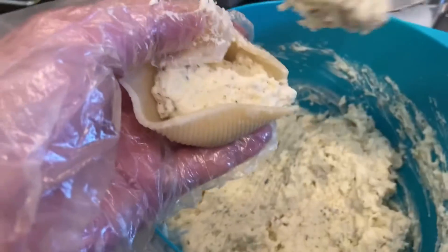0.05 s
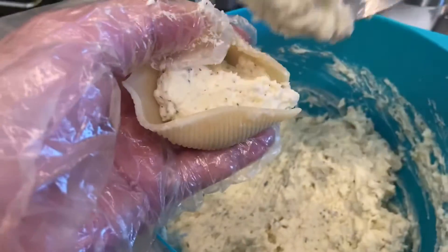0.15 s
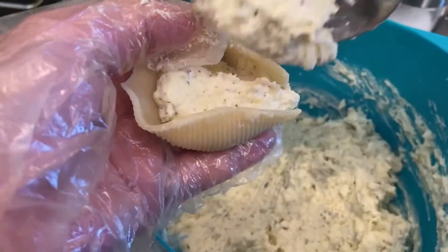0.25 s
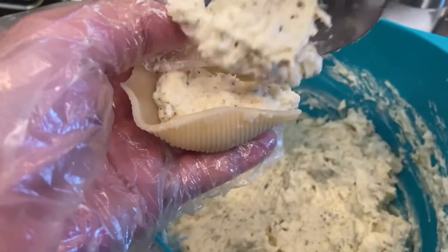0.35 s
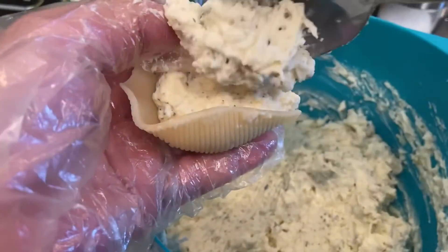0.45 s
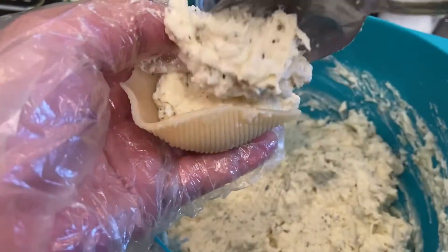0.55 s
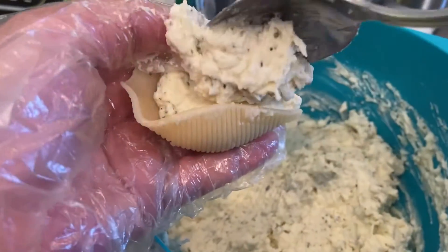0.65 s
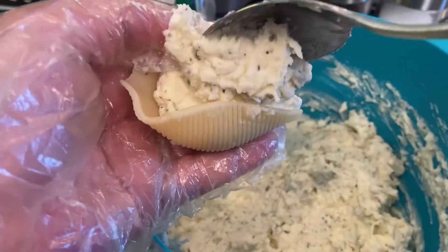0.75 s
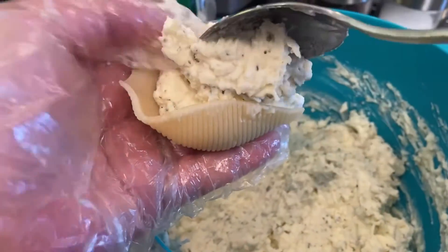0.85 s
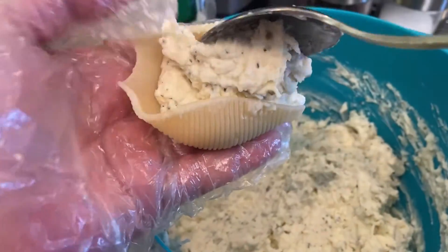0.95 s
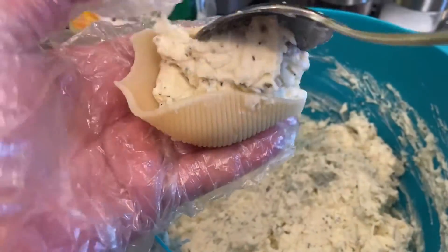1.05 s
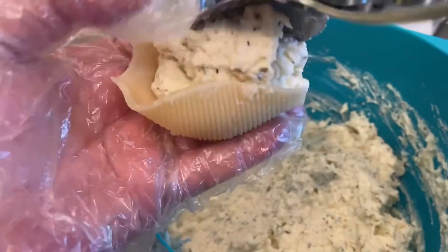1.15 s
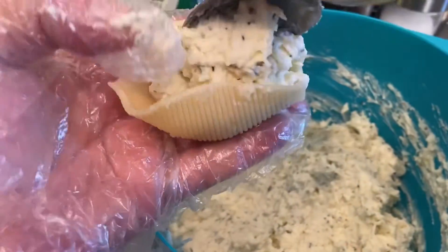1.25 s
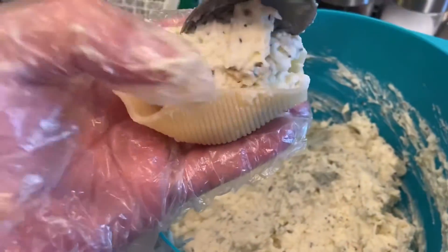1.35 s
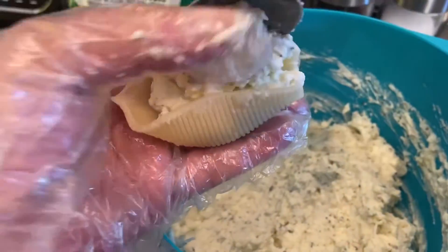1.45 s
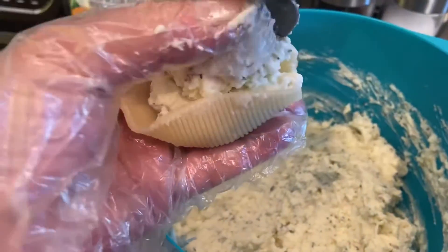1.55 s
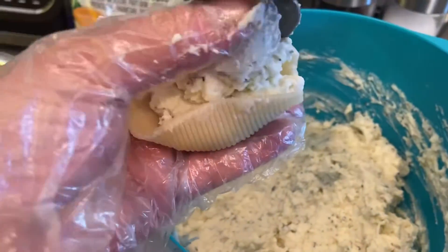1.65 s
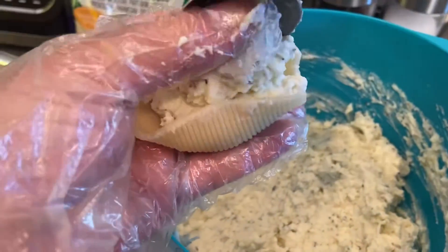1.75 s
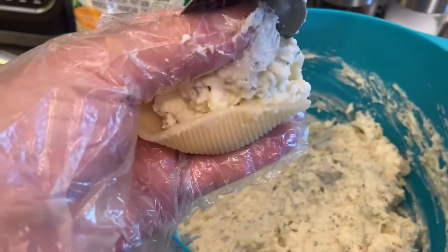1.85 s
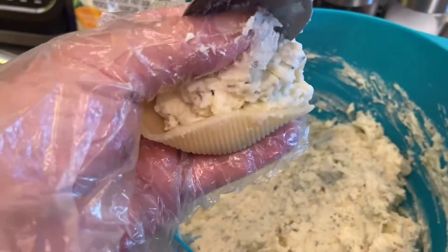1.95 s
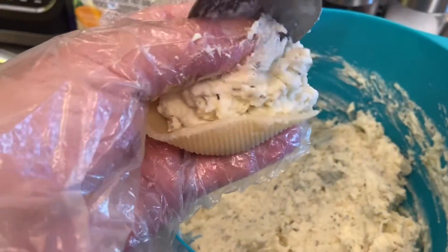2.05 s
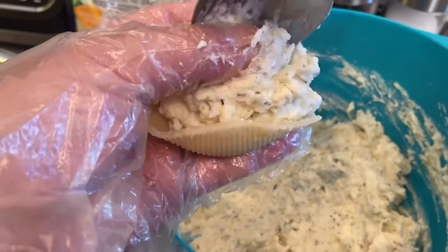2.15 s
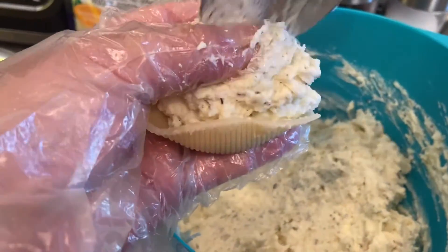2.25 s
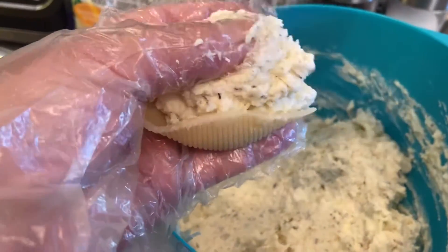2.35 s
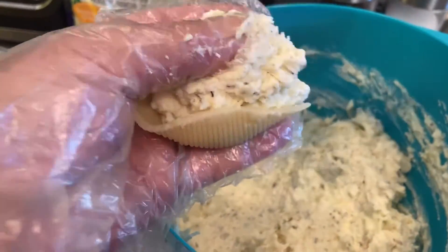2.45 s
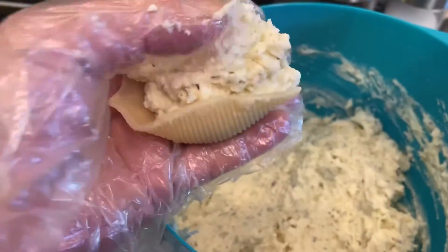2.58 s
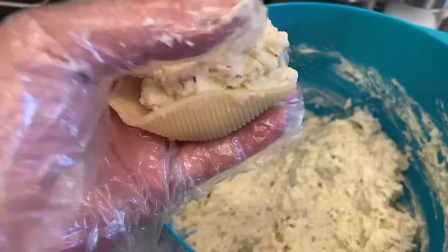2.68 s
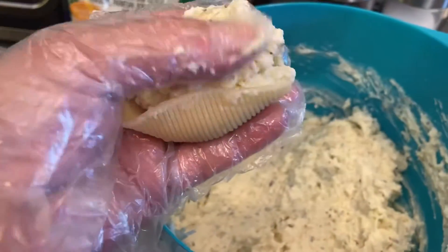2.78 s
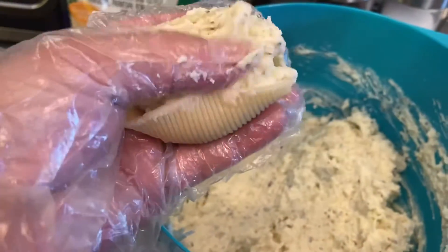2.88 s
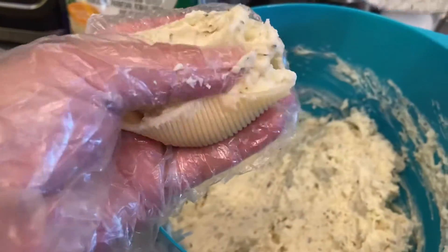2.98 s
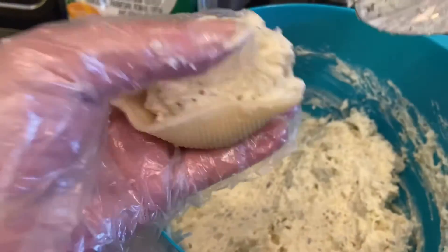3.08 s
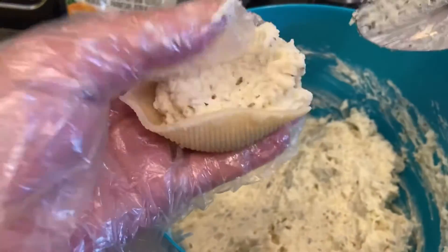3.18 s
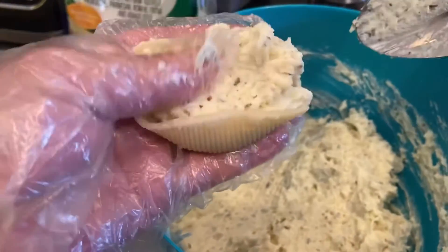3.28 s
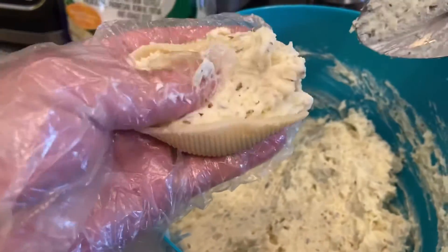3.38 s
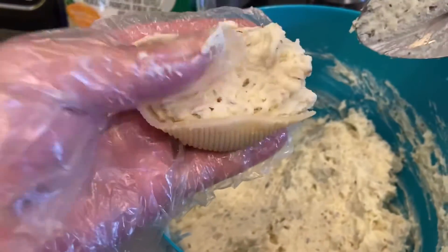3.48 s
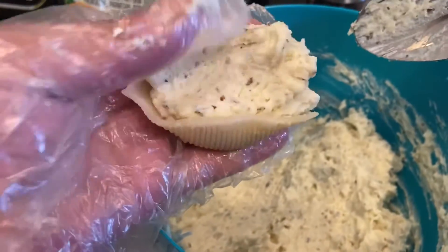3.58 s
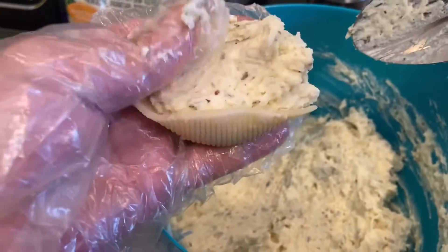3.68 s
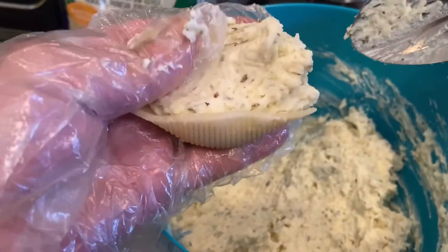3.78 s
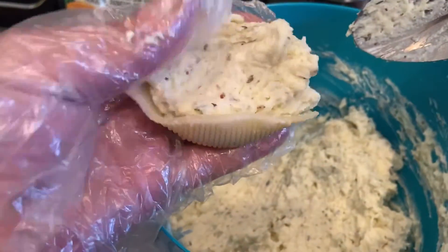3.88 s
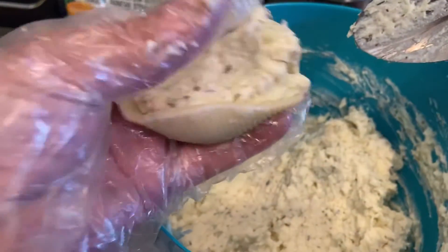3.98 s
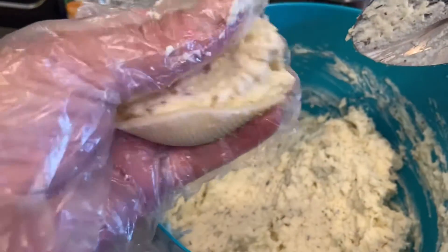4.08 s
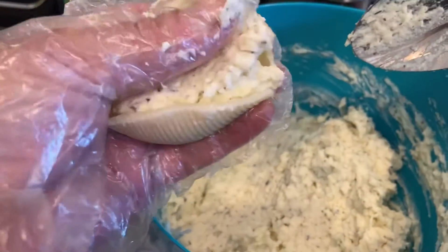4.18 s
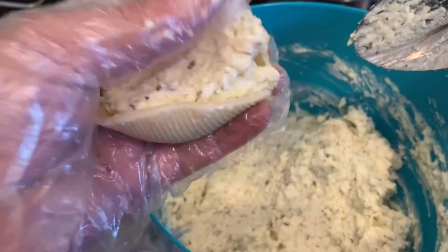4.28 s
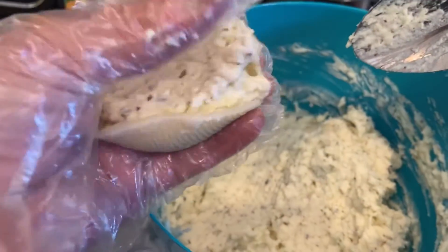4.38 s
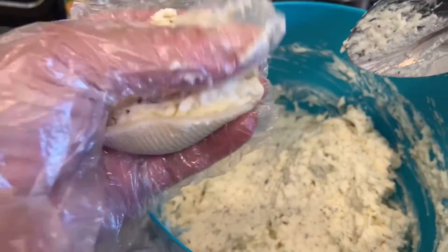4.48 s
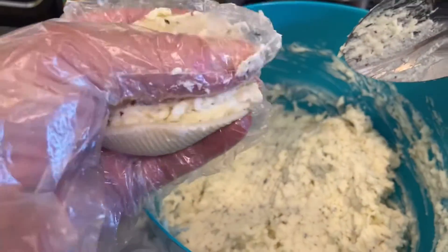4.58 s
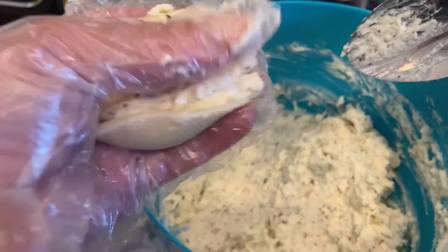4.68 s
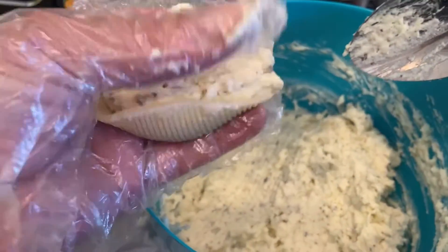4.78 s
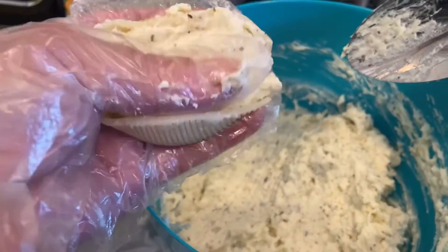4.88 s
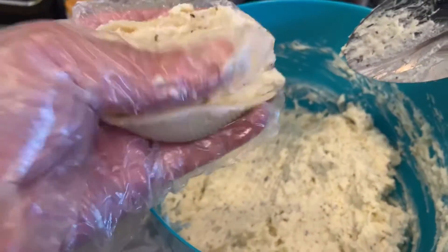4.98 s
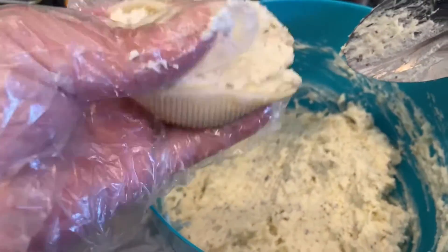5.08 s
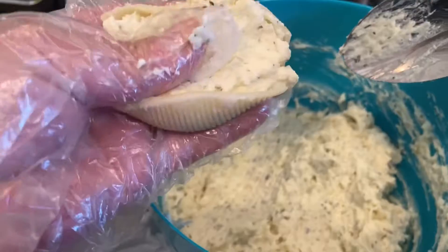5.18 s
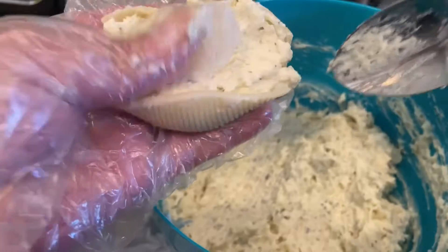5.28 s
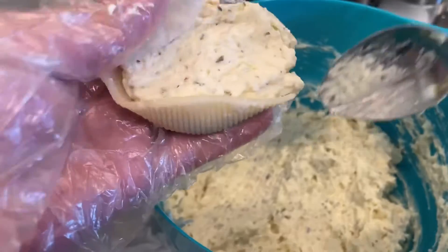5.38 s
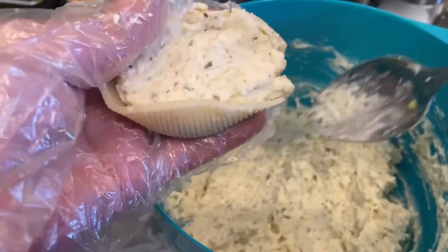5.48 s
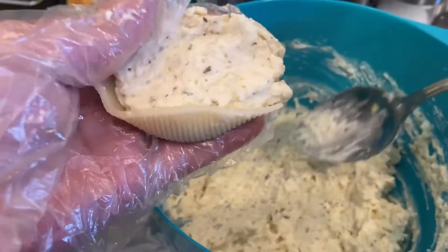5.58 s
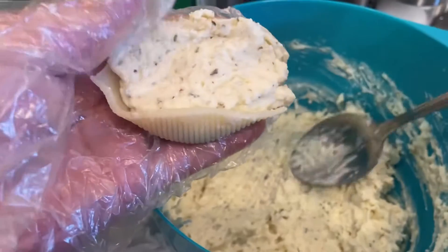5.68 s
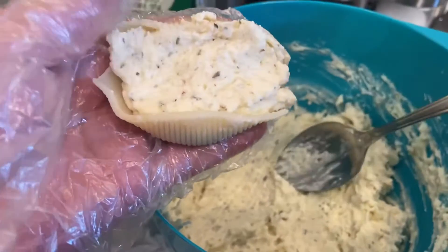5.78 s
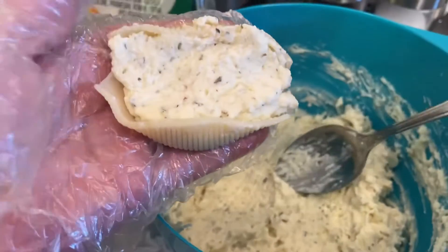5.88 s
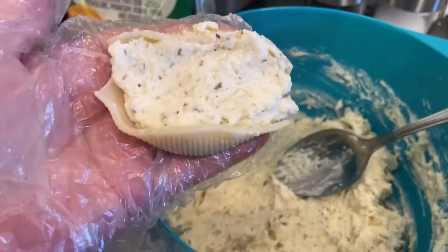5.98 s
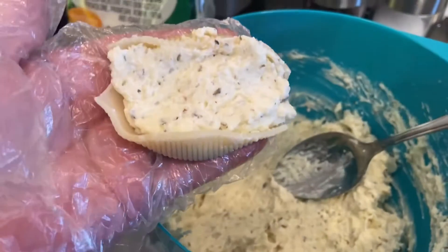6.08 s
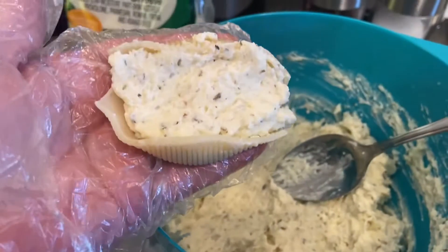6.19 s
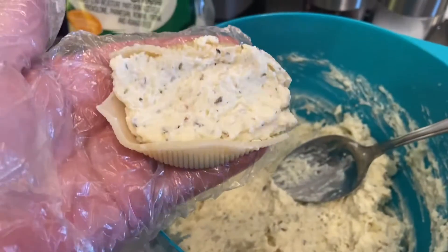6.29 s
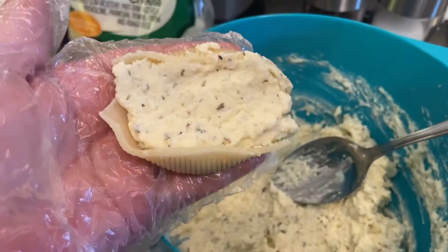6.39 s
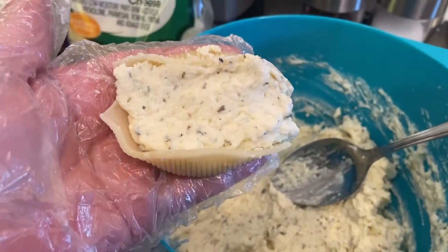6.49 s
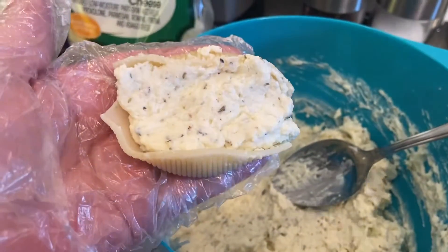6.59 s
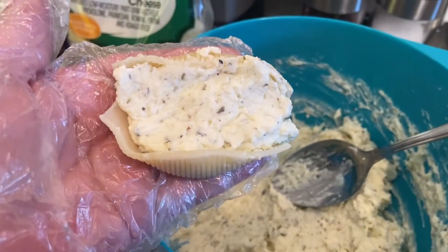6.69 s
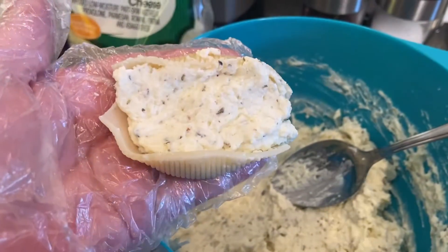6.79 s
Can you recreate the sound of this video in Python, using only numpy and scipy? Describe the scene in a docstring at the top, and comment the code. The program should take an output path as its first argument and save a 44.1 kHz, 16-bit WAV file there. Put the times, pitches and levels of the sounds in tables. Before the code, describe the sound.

A quiet kitchen heard from very close in stereo, with soft low rumble and faint appliance hum throughout. From 0 s a thin plastic glove rustles lightly, with dry crackle and sharp ticks. Between 0.2 and 0.9 s a spoon drags through thick filling in three short gritty mid-high scrapes, leaning left. From 1 to 2.5 s the film keeps rubbing in moderate, overlapping strokes, with moist squelches and tiny low pops. From about 3 to 5.5 s the strokes become much louder, separate bright swishes, strongest near 3.1, 3.5, 3.9, 4.35 and 5.4 s, with snapping creases. Movement fades after 5.7 s. At 6.1 s a spoon lands against the plastic bowl: a sharp, short, hollow clack, rapid smaller chatter for about 0.05 s and a faint room tail. Sparse, weak crinkles and ticks continue to the end, about 6.8 s.

```python
"""A kitchen, close to a small two-port microphone: a gloved hand smooths thick filling into a pasta shell.
The thin plastic film rustles as shaped hiss and crackle with each thumb stroke; flipping creases snap as ticks.
A spoon drags through the filling as gritty noise in a moving resonance; air pockets pop as fading sine blips.
Late on, the spoon drops against a plastic bowl and chatters: decaying modes and a faint room tail.
A low rumble of filtered noise, with a few hums, lies under everything."""
import sys
import numpy as np
from scipy import signal
from scipy.fft import rfft, irfft, next_fast_len
from scipy.io import wavfile
from scipy.ndimage import uniform_filter1d

SR = 44100
rng = np.random.default_rng(int(sys.argv[2]) if len(sys.argv) > 2 else 0)


def store_wav(level_fs):
    """Save 16-bit WAV to argv[1]."""
    pcm = np.round(np.clip(np.atleast_2d(level_fs), -1, 1) * 32767)
    wavfile.write(sys.argv[1], SR, pcm.T.astype(np.int16))


def voltage_ratio(level):
    """Linear amplitude factor for a level in decibels (scalar or array-like)."""
    return 10 ** (np.asarray(level, float) / 20)


N = 301644  # samples


def evened(x):
    """Scales to rms 1."""
    return x / np.sqrt(np.mean(x ** 2) + 1e-20)


def read(points, hz, column=1):
    """Reads a spectrum table on a log-frequency axis."""
    table = np.transpose(points)
    return np.interp(np.log(hz + 1), np.log(table[0] + 1), table[column])


def curve(rows, column=1):
    """Reads a control curve at every sample."""
    table = np.transpose(rows)
    return np.interp(np.arange(N) / SR, table[0], table[column])


def shaped(x, gain):
    """Filters by a gain given as a function of Hz."""
    size = next_fast_len(x.shape[-1] + 512)
    spectrum = rfft(x, size) * gain(np.fft.rfftfreq(size, 1 / SR))
    return irfft(spectrum, size)[..., :x.shape[-1]]


def hump(centre_hz, share):
    """A bell-shaped band on a log axis; share is its spread relative to the centre."""
    return lambda hz: np.exp(-.5 * (np.log((hz + 1) / centre_hz) / share) ** 2)


def wander(samples):
    """Slow random movement of rms 1: white noise averaged over a number of samples."""
    return evened(uniform_filter1d(rng.standard_normal(N), samples))


# Colour of the kitchen rumble: (frequency [Hz], relative density [dB per Hz])
RUMBLE_COLOUR = [(12, -55), (20, -11), (59, 8.5), (81, 7.5), (104, 1), (242, -13.5), (313, -16),
                 (369, -20.5), (584, -34), (652, -17.5), (714, -26), (1330, -31.5), (1600, -46),
                 (2080, -72), (3520, -120)]
# Swell of the deepest part of the rumble: (time [s], level [dB])
RUMBLE_SWELL = [(0, -61), (.08, -62), (.14, -44.5), (.25, -48.5), (.34, -59.5), (2.2, -57), (2.7, -55),
                (3.3, -59), (4.7, -64), (5.9, -60), (6.14, -53), (6.4, -60.5), (6.84, -59)]
# How alike the rumble is at the two ports: (frequency [Hz], likeness [-1 to 1])
RUMBLE_LIKENESS = [(60, 0.91), (130, 0.93), (290, 0.59), (640, -0.07), (1410, -0.8), (3100, 1),
                   (6820, -0.06), (15000, 0.2)]
# Hums of appliances: (frequency [Hz], width [Hz], level [dB])
APPLIANCE_HUMS = [(84, 23, -63), (284.4, 11.5, -70.5), (321.9, 3.2, -69)]


def rumble():
    """Room noise with a likeness between ports set by frequency; its deepest part swells; narrow noises hum."""
    upper_db = -61
    first, second = rng.standard_normal((2, N))

    def same(hz):
        return np.clip(read(RUMBLE_LIKENESS, hz), -1, 1)

    def deep(hz):
        return 1 / (1 + (hz / 130) ** 4)

    def colour(hz):
        return voltage_ratio(read(RUMBLE_COLOUR, hz))

    right = shaped(first, same) + shaped(second, lambda hz: np.sqrt(1 - same(hz) ** 2))
    pair = np.array([first, right])
    out = evened(shaped(pair, lambda hz: deep(hz) * colour(hz))) * voltage_ratio(curve(RUMBLE_SWELL))
    out += evened(shaped(pair, lambda hz: (1 - deep(hz)) * colour(hz))) * voltage_ratio(upper_db)
    for hz, width_hz, db in APPLIANCE_HUMS:
        band = hump(hz, width_hz / hz / 2)
        out += voltage_ratio(db) * evened(shaped(rng.standard_normal(N), band))
    return out


# Movements of the gloved thumb and fingers:
# (peak time [s], effort level [dB], rise [s], fall [s], extra squelch effort where it digs in [dB])
THUMB_STROKES = [(.04, -55.5, .1, 0.3, 0.5), (.13, -61.5, 0.13, 0.2, -5), (.2, -63, 0.027, 0.025, 0),
                 (.3, -62.5, .03, .04, 7), (.405, -54.5, 0.054, 0.021, -1.5),
                 (.445, -50.5, 0.026, 0.034, -2), (.483, -55.5, .015, 0.045, 2),
                 (.562, -54, 0.038, 0.032, -5), (.61, -57, .04, 0.1, -1), (.665, -59, 0.016, 0.035, 2),
                 (.75, -50.5, 0.071, 0.14, -0.5), (.885, -51.5, 0.037, 0.12, 4),
                 (.96, -49, 0.11, 0.048, -1.5), (1.04, -53.5, 0.05, .05, 1),
                 (1.125, -51.5, 0.097, 0.18, -2.5), (1.21, -51.5, 0.11, 0.11, -1.5),
                 (1.335, -50, 0.013, 0.16, -1), (1.45, -50.5, 0.11, 0.091, 3), (1.53, -48, 0.071, 0.12, 2),
                 (1.65, -52.5, 0.048, 0.11, 6), (1.71, -48.5, 0.081, 0.059, -4),
                 (1.79, -50.5, 0.045, 0.095, 1), (1.88, -51.5, 0.094, 0.21, -5),
                 (1.99, -56.5, 0.11, 0.15, 6), (2.13, -56, 0.1, 0.11, -5), (2.2, -54.5, 0.097, 0.08, 3),
                 (2.3, -45.5, 0.028, 0.038, -3), (2.38, -56.5, 0.043, 0.089, 6.5),
                 (2.52, -48.5, 0.028, 0.3, -2), (2.67, -44, 0.14, 0.1, 2.5), (2.79, -47, 0.066, 0.24, -7),
                 (2.88, -48, 0.17, 0.064, -6), (2.96, -50, 0.061, 0.064, -2),
                 (3.12, -36.5, 0.064, 0.072, -1.5), (3.249, -40.5, 0.026, 0.22, -2.5),
                 (3.525, -36.5, 0.043, 0.12, -5), (3.688, -38.5, 0.064, 0.072, -2),
                 (3.798, -49, 0.099, 0.055, 3), (3.923, -36.5, 0.037, 0.042, 1),
                 (4.04, -46.5, 0.11, 0.092, 2), (4.14, -41.5, 0.078, 0.082, -3),
                 (4.346, -36, 0.028, 0.05, -2.5), (4.52, -43.5, 0.21, 0.12, 0),
                 (4.762, -41.5, 0.061, 0.07, 1.5), (4.91, -44.5, 0.076, 0.082, 0.5),
                 (5.06, -38, 0.046, 0.073, -1), (5.17, -40.5, .06, 0.094, 2), (5.331, -55, .015, .04, -5),
                 (5.37, -34.5, 0.035, 0.029, 0), (5.45, -41.5, 0.057, 0.083, 2.5),
                 (5.68, -47.5, 0.072, 0.083, -3), (5.81, -55.5, 0.12, 0.18, 0),
                 (5.92, -55.5, 0.18, 0.18, 5.5), (6.01, -51.5, 0.15, .1, -3),
                 (6.11, -55.5, 0.041, 0.076, 0), (6.3, -62, .08, 0.14, -3), (6.41, -60, 0.017, 0.18, -6),
                 (6.58, -68, .015, 0.024, -4), (6.635, -68.5, 0.0089, .025, 6),
                 (6.83, -67, 0.016, .03, -4.5)]


def effort():
    """Every stroke swells to its peak and dies away; powers add. In dB: plain, and with the digging in."""
    rest_db = -77.5  # glove at rest
    ends_db, roundness = -13.5, 1.23  # drop after one rise or fall time, shape of the top
    t = np.arange(0, N + 64, 64) / SR  # coarse steps, joined up below
    power = np.full((2, len(t)), voltage_ratio(2 * rest_db))
    for s, db, rise, fall, dig_db in THUMB_STROKES:
        away = abs(t - s) / np.maximum(np.where(t < s, rise, fall), .005)
        peak_db = db + np.array([[0], [dig_db]])
        power = power + voltage_ratio(2 * (peak_db + ends_db * away ** roundness))
    return np.array([np.interp(np.arange(N) / SR, t, 10 * np.log10(row)) for row in power])


def sliding(flicker_db, patchy_db):
    """Hiss whose colour shifts in patches as other folds of film rub."""
    noise = rng.standard_normal((2, N)) * voltage_ratio(flicker_db * wander(300))
    z = signal.stft(noise, nperseg=256)[2]
    patches = rng.standard_normal(z.shape[1:])
    patches = uniform_filter1d(patches, size=5, axis=0)  # across frequency
    patches = evened(uniform_filter1d(patches, size=9, axis=1))  # across time
    return evened(signal.istft(z * voltage_ratio(patchy_db * patches), nperseg=256)[1][:, :N])


def crackle(per_s, spread_db, t60, share, clump_db):
    """Many tiny noise bursts, each in one of several colours, arriving in clumps."""
    out, t = np.zeros((2, N)), np.arange(600) / SR
    clumps = voltage_ratio(clump_db * wander(700))
    for centre_hz in np.geomspace(400, 16000, num=11):
        size = voltage_ratio(spread_db * np.minimum(rng.exponential(1, N), 4))
        size *= rng.random(N) < per_s * clumps / SR
        bursts = signal.oaconvolve(size, voltage_ratio(-60 * t / t60))[:N]
        out += shaped(bursts * rng.standard_normal((2, N)), hump(centre_hz, share))
    return evened(out)


# Colours of film, bright edge, squelching filling, pushing hand and film pulled taut under hard strokes:
# each (frequency [Hz], relative density [dB per Hz])
FILM_COLOUR = [(1000, -10.5), (2000, -14), (2600, 3.5), (3200, 1), (4000, 4.5), (4700, 5), (5500, -4.5),
               (7000, 5), (8200, 9), (9500, -0.5)]
EDGE_COLOUR = [(6500, -27.5), (8200, -11.5), (9000, -21.5), (10000, 3), (11500, 2), (13200, 3),
               (15700, 3.5)]
SQUELCH_COLOUR = [(450, -51), (700, -7.5), (1000, 0.5), (1400, -2), (1700, -1), (2300, 1), (3200, -9)]
PUSH_COLOUR = [(80, 2), (160, 4.5), (300, -0.5), (450, 0), (600, -10.5), (800, -26)]
TAUT_COLOUR = [(3000, -36), (4300, -6.5), (5700, -1), (7000, -5.5), (9000, -37)]
# How the layers sit against the rustle as the grip changes:
# (time [s], bright edge [dB], squelch [dB], push [dB], crackle share of power before effort [0 to 1])
GRIP_BALANCE = [(0, -1, -7.5, -0.5, 0.2), (.5, -1, -5, -16, 0.88), (.9, 3, -1, -3, 0.45),
                (1.4, 5, -2, -1.5, 0.27), (1.8, 4.5, -11, -12.5, 0.48), (2.3, 1, -12, -8, 0.57),
                (2.7, 3, -4, -7.5, 0.37), (3.2, 2, -5, -15, 0.16), (3.8, 0.5, -7, -10, 0.62),
                (4.5, 1, -4, -9, 0.35), (5.3, 0.5, -9, -10, 0.26), (5.7, 0, -5.5, -13.5, .45),
                (6.05, 4, -6.5, 2.5, 0.59), (6.3, -3, -2, 4, 0.6), (6.55, -4, -3, 6, 0.68),
                (6.84, -15, -1.5, 5.5, .9)]
# Response of film, edge, squelch, push and taut film: one value each (level gained per effort [dB per dB])
EFFORT_FOLLOW = [0.93, 0.86, 0.92, 0.75, 1.55]
USUAL_DB = -50  # effort at which the layers sit as listed


def glove(slide, drive, effort_db):
    """A drive excites film, bright edge, filling, hand and taut folds; the sliding hiss sets the scale."""
    plain_db, digging_db = effort_db
    layers = [(FILM_COLOUR, plain_db, 0),
              (EDGE_COLOUR, plain_db, curve(GRIP_BALANCE, column=1)),
              (SQUELCH_COLOUR, digging_db, curve(GRIP_BALANCE, column=2)),
              (PUSH_COLOUR, plain_db, curve(GRIP_BALANCE, column=3)),
              (TAUT_COLOUR, plain_db, -16.5)]
    out = 0
    for (colour, layer_effort_db, offset_db), follow in zip(layers, EFFORT_FOLLOW):
        gain = lambda hz: voltage_ratio(read(colour, hz))
        level_db = USUAL_DB + follow * (layer_effort_db - USUAL_DB) + offset_db
        out = out + shaped(drive, gain) / np.std(shaped(slide, gain)) * voltage_ratio(level_db)
    return out


# The glove, close by, in the left and right channels:
# (frequency [Hz], likeness before it is lowered between phase steps [0 to 1],
#  right lead before the treble phase is added [rad], left over right [dB])
PORT_RESPONSE = [(100, .92, 0, 0), (300, .85, 0, 0), (500, .6, 0, 2), (1000, .7, -.8, 4),
                 (1500, .35, -1.4, 4), (2000, .3, -1.6, 6), (2700, .3, -3, 9), (3100, .3, -5.5, 5),
                 (3700, .75, -6.3, 2.5), (5400, .5, -6.3, 2), (6300, 1, -2 * np.pi, 0)]
# The treble phase between the channels holds in steps: (frequency [Hz], right lead [half turns])
PHASE_STEPS = [(7450, 0), (8300, 1), (9600, 1), (10400, 2), (11600, 2), (12450, 3), (13800, 3), (14650, 4)]


def ports(pair, linger):
    """The left channel has the first sound; the right a turned copy mixed with a second sound."""
    def half_turns(hz):  # between a plain port delay and the stepped phase
        plain = np.maximum(hz - 6850, 0) / 2130
        return linger * read(PHASE_STEPS, hz) + (1 - linger) * plain

    def same(hz):  # likeness is lowered between the phase steps
        lowered = 2.7 * np.sin(np.pi * read(PHASE_STEPS, hz)) ** 2
        return np.clip(read(PORT_RESPONSE, hz) - lowered, 0, 1)

    def turned(hz):
        lead = read(PORT_RESPONSE, hz, column=2) + np.pi * half_turns(hz)
        return same(hz) * np.exp(1j * lead)

    def lean(hz):
        return voltage_ratio(np.array([[.5], [-.5]]) * read(PORT_RESPONSE, hz, column=3))

    right = shaped(pair[0], turned)
    right += shaped(pair[1], lambda hz: np.sqrt(1 - same(hz) ** 2))
    return shaped(np.array([pair[0], right]), lean)


def hand():
    """Smooth sliding and crackle share each stroke's power; single snaps join the crackle."""
    effort_db = effort()
    smoothing = 0.0096  # crackle share lost for each dB of effort
    share = curve(GRIP_BALANCE, column=4) - smoothing * (effort_db[0] - USUAL_DB)
    share = np.clip(share, .05, 1)
    puffs = crackle(per_s=90, spread_db=3, t60=0.013, share=0.46, clump_db=4)
    ticks = crackle(per_s=30, spread_db=2.8, t60=.003, share=.7, clump_db=3)
    grains = evened(puffs + voltage_ratio(-4) * ticks)
    slide = sliding(flicker_db=0.85, patchy_db=2.0)
    smooth = glove(slide, np.sqrt(1 - share) * slide, effort_db)
    sharp = glove(slide, np.sqrt(share) * grains, effort_db) + snaps()
    return ports(smooth, linger=1.0) + ports(sharp, linger=0.14)


# The spoon drags through filling: (time [s], level before the lean to the left port [dB], centre [Hz])
SPOON_DRAG = [(.2, -62, 2377), (.36, -68.5, 2327), (.42, -56, 2220), (.53, -67, 2214), (.57, -54.5, 2250),
              (.69, -66, 2100), (.75, -51, 1784), (.81, -57, 1900), (1.0, -78, 2200)]


def scrape(width_hz=450, rough_db=5):
    """Gritty noise in one moving resonance, louder at the left port."""
    grit = rng.standard_normal((2, N)) * voltage_ratio(rough_db * wander(200))
    low = signal.sosfilt(signal.butter(2, width_hz / 2, fs=SR, output="sos"), grit)
    turns = np.cumsum(curve(SPOON_DRAG, column=2)) / SR
    band = evened(low * np.cos(2 * np.pi * turns))  # moves the low noise up to the resonance
    t = np.arange(N) / SR
    on = np.clip(np.minimum(t - SPOON_DRAG[0][0], SPOON_DRAG[-1][0] - t) / .05, 0, 1)
    lean = voltage_ratio(np.array([[2.5], [-4]]))  # left, right
    return band * on * voltage_ratio(curve(SPOON_DRAG)) * lean


# Creases that flip, before the ports colour them:
# (time [s], peak level [dB], centre [Hz], width as a share of the centre, at least 0.15 when played)
CREASE_SNAPS = [(0.2367, -35, 11500, 0.62), (.3087, -36, 11600, 1), (0.403, -28.5, 7050, 1),
                (.48, -31, 11800, 0.86), (.5541, -37, 11500, .5), (0.598, -36, 4660, 1),
                (.6584, -32, 10600, 0.62), (0.707, -33, 10400, 0.64), (0.7412, -27, 7510, 0.95),
                (.84, -28, 10900, 0.36), (.8765, -27, 9000, .9), (.9233, -29, 11200, 0.47),
                (1.132, -24, 9000, .8), (1.168, -25.5, 9100, 0.43), (1.3247, -28, 8800, 0.67),
                (1.518, -30, 4000, 0.25), (1.7653, -33, 11100, .6), (1.8515, -27, 6630, 0.76),
                (1.8655, -37, 6800, 0.82), (1.885, -29.5, 7340, 0.55), (1.972, -28, 11800, 0.45),
                (2.0047, -28, 11400, 0.25), (2.064, -31.5, 10900, .4), (2.0936, -35, 10900, .7),
                (2.1262, -26.5, 11200, .85), (2.165, -30, 10900, 0.24), (2.1986, -30, 7800, 0.47),
                (2.22, -34, 11000, 0.36), (2.294, -27, 8000, 0.2), (2.4404, -44, 7800, .6),
                (2.5076, -30, 10600, 0.41), (2.7072, -35, 7320, 0.8), (3.0703, -27, 5770, .6),
                (3.1038, -22, 6000, 0.15), (3.24, -27.5, 5670, 0.21), (3.264, -23, 6130, 0.2),
                (3.337, -26, 7000, .6), (3.496, -23.5, 6440, .8), (3.8464, -30.5, 7200, .35),
                (3.8711, -32, 11600, 0.89), (3.904, -21, 11300, 0.53), (4.279, -35, 11400, .7),
                (4.3312, -23, 7000, .46), (4.597, -25, 11900, .5), (4.7332, -27, 7900, 0.51),
                (4.8737, -22, 11200, 1), (4.982, -28.5, 10700, .55), (5.026, -32, 10500, .7),
                (5.3188, -27, 7040, .36), (5.3355, -28, 6980, 0.41), (5.3585, -22, 11500, .7),
                (5.532, -25.5, 10700, 1), (5.5723, -32.5, 11300, 0.97), (5.8154, -27.5, 10600, 0.28),
                (5.853, -28.5, 9800, 0.93), (5.952, -23, 11600, 1), (6.0117, -28, 11700, 0.51),
                (6.2553, -42, 3560, 0.86), (6.277, -29.5, 8140, 0.86), (6.3055, -33, 11600, .5),
                (6.3448, -42, 3520, 0.51), (6.3555, -39, 4770, 0.79), (6.364, -39, 10600, .66),
                (6.4728, -33, 11000, 1), (6.4924, -39, 3950, 1), (6.5274, -38, 11100, 0.57),
                (6.5695, -36.5, 7260, .5), (6.588, -37, 10800, 0.8), (6.601, -51, 4000, 0.87),
                (6.6119, -51, 7700, .9), (6.6293, -28.5, 11000, 0.53), (6.6374, -35, 7540, 0.31),
                (6.6604, -37.5, 11100, 1), (6.7017, -46, 5300, .35), (6.741, -47, 4210, .8),
                (6.771, -38.5, 9000, 0.75), (6.809, -52, 5130, 0.87), (6.822, -38, 10800, 0.74)]


def snaps():
    """Each flipping crease is a sharp tick and a short fading hiss around its own colour."""
    t60_s, attack_s = 0.0089, 0.00019
    out, t = np.zeros((2, N + 2000)), np.arange(-100, 1400) / SR
    noise = rng.standard_normal((len(CREASE_SNAPS), 2, len(t)))
    for (s, db, hz, share), puff in zip(CREASE_SNAPS, noise):
        hiss = puff * voltage_ratio(-60 * t / t60_s) * np.clip(t / attack_s, 0, 1)
        tick = 2.0 * (t == 0)
        burst = shaped(hiss + tick, hump(hz, max(share, .15)))
        at = max(round(s * SR) - 100, 0)
        out[:, at:at + len(t)] += voltage_ratio(db) * burst / abs(burst).max(1, keepdims=True)
    return out[:, :N]


# Air pockets in the filling pop: (time [s], level before rise and decay [dB], frequency [Hz])
AIR_POPS = [(1.035, -43, 710), (1.39, -40, 424), (1.46, -42, 760), (1.95, -48, 680), (1.982, -49, 895),
            (2.065, -48, 650), (2.32, -47, 700), (2.425, -46, 680), (6.278, -47.5, 1900),
            (6.638, -55, 1090)]


def pops():
    """Air pockets give short soft sine blips, nearer the left port."""
    rise_s, t60_s, right_db = 0.0027, 0.032, -7
    out, t = np.zeros(N), np.arange(0, .06, 1 / SR)
    for s, db, hz in AIR_POPS:
        shape = np.minimum(t / rise_s, 1) * voltage_ratio(db - 60 * t / t60_s)
        out[round(s * SR):][:len(t)] += shape * np.sin(2 * np.pi * hz * t)
    return np.array([out, out * voltage_ratio(right_db)])


def kitchen(x, t60, delay):
    """The room answers with sparse taps of random sign that die away, other taps for each port."""
    t = np.arange(0, .5, 1 / SR)
    signs = rng.choice([-1., 1.], (2, len(t)))
    taps = signs * (rng.random((2, len(t))) < .05) * (t > delay)
    taps *= voltage_ratio(-60 * t / t60)
    return signal.fftconvolve(x, taps / np.linalg.norm(taps[0]), axes=1)[:, :N]


# Modes of the plastic bowl under the spoon:
# (frequency [Hz], relative level [dB], t60 [s], at least 0.01 when played, left over right [dB])
BOWL_MODES = [(298, -22.5, 0.11, 8.5), (140, -27.5, 0.13, 3), (432, -26.5, 0.22, 3), (686, -23.5, .05, 9),
              (920, -25, .04, 0), (1270, -12.5, 0.064, -15), (1355, -35, .45, -7), (1334, -31, 0.18, -3),
              (540, -26, 0.04, -3), (1314, -9.5, 0.049, 1.5), (1475, -21, 0.055, 3.5),
              (1960, -19, 0.074, 10), (2064, -2.5, 0.028, 3), (2186, 6.5, 0.012, -1.5),
              (2370, -12, 0.035, 13.5), (2720, -11, 0.029, 12), (3330, -20, 0.049, -4),
              (4050, -11.5, 0.022, 6), (3080, -18, 0.031, 4), (1775, -13, 0.022, -9), (4240, -16, 0.014, 0),
              (2120, -9.5, .008, 5), (3820, -14, .006, 7.5)]
# Blows of the falling spoon: (time [s], level applied to the modes [dB])
SPOON_BLOWS = [(6.1090, -14), (6.113, -30), (6.1239, -22), (6.13, -23.5), (6.142, -38), (6.1530, -40)]


def spoon():
    """The spoon lands and chatters; every blow rings the same modes, later ones at slightly other spots."""
    t, out = np.arange(0, .5, 1 / SR), np.zeros((2, N))
    hz, db, t60, lean_db = np.transpose(BOWL_MODES)[:, :, None]
    onset = (1 - np.exp(-t / 0.0008)) ** 2
    modes = voltage_ratio(db - 60 * t / np.maximum(t60, .01)) * np.sin(2 * np.pi * hz * t) * onset
    lean = voltage_ratio(np.array([[.5], [-.5]]) * lean_db.T)
    spots = rng.standard_normal((len(SPOON_BLOWS), len(BOWL_MODES)))
    for k, ((s, blow_db), spot) in enumerate(zip(SPOON_BLOWS, spots)):
        later = min(k, 1)
        dull = voltage_ratio(-.8 * later * hz.T / 1000)  # later blows lose treble
        strike = lean * dull * voltage_ratio(2.2 * later * spot)
        out[:, round(s * SR):][:, :len(t)] += voltage_ratio(blow_db) * strike @ modes
    mellow = shaped(out, lambda hz: 1 / (1 + (hz / 2200) ** 4))
    return out + voltage_ratio(-12) * kitchen(mellow, t60=0.43, delay=0.0041)


def scene():
    """Room, hand, filling and spoon."""
    return rumble() + hand() + scrape() + pops() + spoon()


def top_cut(x):
    """Nothing passes above the cut-off."""
    return signal.sosfilt(signal.butter(12, 16960, fs=SR, output="sos"), x)


def record(dry):
    """The microphone adds its own noise, and the treble is cut off just under 16 kHz."""
    hiss_db = -79  # before the band limit
    noisy = dry + voltage_ratio(hiss_db) * rng.standard_normal(dry.shape)
    limited = shaped(noisy, lambda hz: np.clip((16000 - hz) / 300, .003, 1))
    return top_cut(limited)


dry = scene()
out = record(dry)
store_wav(out)
```